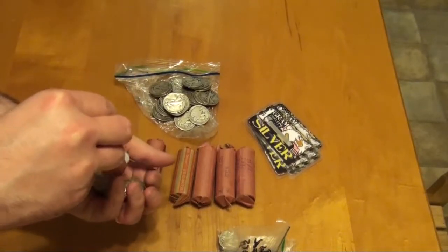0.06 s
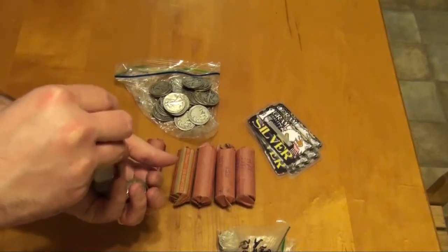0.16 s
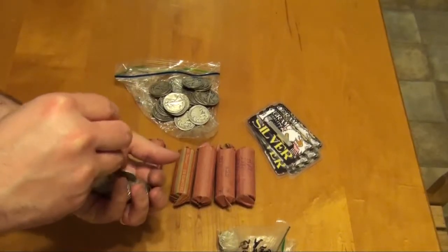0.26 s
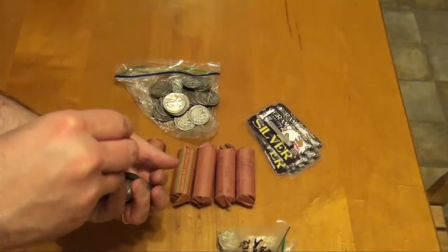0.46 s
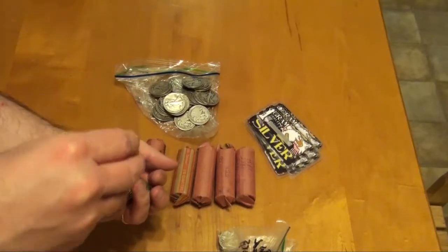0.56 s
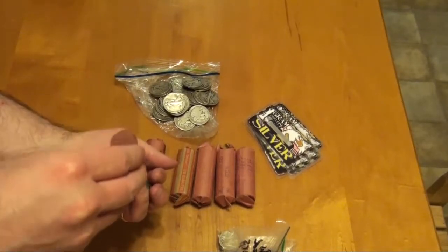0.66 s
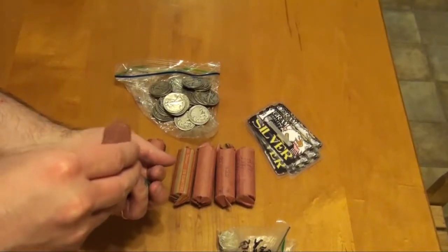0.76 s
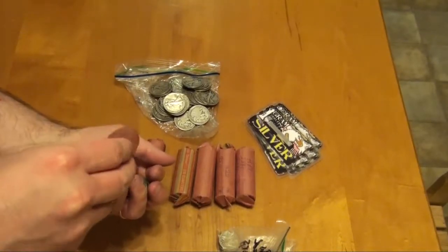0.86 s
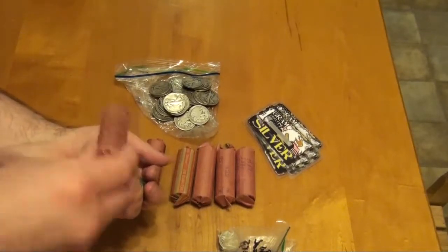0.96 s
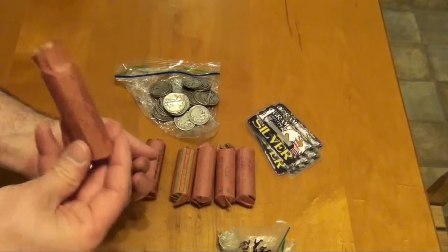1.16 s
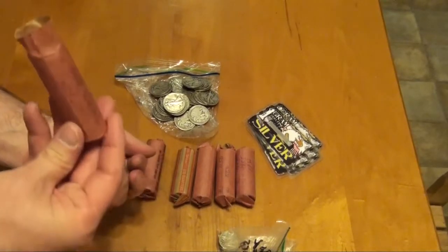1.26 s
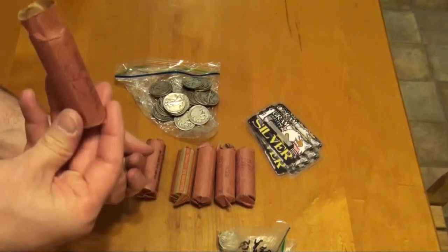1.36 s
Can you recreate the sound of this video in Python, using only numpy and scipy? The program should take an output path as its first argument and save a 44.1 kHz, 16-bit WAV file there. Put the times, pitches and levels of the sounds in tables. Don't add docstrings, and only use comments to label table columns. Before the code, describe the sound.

Coins clink brightly as they slide from a paper roll into a palm: a few light ticks, a dense jingling burst, one last clink, then faint paper rustle in a quiet room, close stereo microphone.

```python
import sys
import numpy as np
from scipy import signal
from scipy.fft import rfft, irfft
from scipy.io import wavfile
from scipy.ndimage import uniform_filter1d

SR = 44100
rng = np.random.default_rng(int(sys.argv[2]) if len(sys.argv) > 2 else 0)


def digitize_waveform(pressure):
    field = np.atleast_2d(pressure).T
    bounded = np.clip(field, -1, 1)
    quanta = np.round(bounded * 32767).astype(np.int16)
    wavfile.write(sys.argv[1], SR, quanta)


def ratio(d):
    e = np.asarray(d, float) / 20
    return 10 ** e


N = 61739

# (frequency [Hz], density [dB per Hz])
AIR_MID_SPECTRUM = [(20, -29), (60, -2.5), (110, -3.5), (300, -10), (930, -19), (2500, -24), (9000, -26.5),
                    (16000, -27.5)]
AIR_SIDE_SPECTRUM = [(20, -52), (60, -14), (170, -5), (600, -5.5), (1200, -10.5), (4500, -24),
                     (10700, -35.5), (15500, -49.5)]
# (centre [s], length [s], level [dB], body re hiss [dB])
RUB_EVENTS = [(.008, .012, -47, -8), (.023, .012, -44, -7), (.061, .012, -47, -20), (.081, .010, -46, -20),
              (.128, .04, -60, 3), (.126, .007, -43, -18), (.157, .007, -38, -18), (.165, .012, -38, -17),
              (.247, .010, -40, -20), (.03, .12, -55, -5), (.19, .05, -59, -10), (.56, .05, -59, -3),
              (.65, .06, -62, -9), (.74, .05, -61, -9), (.775, .03, -58, -7), (.85, .05, -61, -10),
              (.91, .07, -63, -10), (.955, .012, -58, -15), (.985, .035, -57, -15), (1.05, .08, -64, -10),
              (1.115, .045, -59, -12), (1.16, .06, -65, -10)]
# (frequency [Hz], density [dB per Hz])
RUB_SPECTRUM = [(1500, -32.5), (2900, -21), (4500, -7), (6300, -10.5), (8300, -2.5), (10500, -8.5),
                (13400, -22.5), (16000, -41.5)]
# (frequency [Hz], width [Hz], level [dB])
TUBE_MODES = [(790, 92, -2), (1260, 120, 3), (1764, 170, -7), (2090, 80, -3.5)]
# (time [s], level [dB])
KNOCK_EVENTS = [
    (0.016, -60),
    (0.533, -61.5),
    (1.199, -65),
]
# (time [s], pitch [Hz], level [dB], T60 [s])
TAP_EVENTS = [(0.0197, 4160, -42.5, 0.035), (0.0241, 1314, -46, 0.043), (.0435, 4830, -36.5, 0.019),
              (0.09, 4650, -47, 0.011), (0.111, 1150, -49.5, 0.035), (.1135, 2206, -45.5, 0.043),
              (.1155, 790, -43.5, 0.062), (0.1172, 1299, -46, .04), (.119, 1762, -45, 0.04),
              (.126, 1248, -46, 0.084), (.154, 1886, -52.5, 0.066), (.2405, 3903, -31.5, 0.022),
              (.2455, 4486, -35, .02)]
# (time [s], peak [dB], ping pitch [Hz], thud re ping [dB])
TICK_EVENTS = [(.0435, -19.5, 7980, -12.5), (0.056, -30, 9800, -18.5), (.0577, -23.5, 9300, -22),
               (0.0893, -27.5, 8000, -14), (0.1116, -23.5, 8000, -6), (0.1199, -28.5, 8030, -15),
               (0.225, -21.5, 9050, -5.5), (0.2404, -27, 9600, 0.5), (0.2413, -14, 8960, -10),
               (0.2442, -22, 8500, -24.5), (0.2463, -19, 8266, -10.5), (0.2571, -15, 9530, -22.5),
               (0.2594, -18, 9250, -22), (0.2617, -16, 9035, -31.5), (.2671, -22.5, 8320, -18),
               (0.2747, -20, 8260, -20.5), (0.281, -22, 9400, -30), (0.2913, -21.5, 8800, -30),
               (0.295, -30, 9050, -25.5), (0.3004, -25, 9250, -24), (0.3062, -28, 8850, -22),
               (0.3112, -27, 9100, -22), (.0785, -33, 8070, -20.5), (0.081, -36, 7980, -19),
               (0.1241, -30, 8300, -19.5), (0.1556, -31, 7830, -14), (0.3849, -17, 9270, -23),
               (0.4008, -27, 8950, -11.5), (0.411, -32, 8470, -21), (0.413, -22, 8300, -26.5),
               (0.4157, -25, 8160, -28), (.407, -40, 8050, -25), (.5350, -41.5, 8770, -11),
               (0.9491, -46, 9000, -10), (.9660, -32.5, 9460, -1.5), (0.9669, -22.5, 8000, -30),
               (0.9692, -41.5, 7870, -2)]
# (frequency [Hz], density [dB per Hz])
SNAP_SPECTRUM = [(3000, -30.5), (6500, -10), (9000, 1.5), (12500, -16.5), (16000, -24)]
THUD_SPECTRUM = [(1000, -23.5), (2100, -8.5), (4300, 2.5), (6500, -12.5)]
# (start [s], length [s], start level [dB], end level [dB])
BRIGHT_STRETCHES = [(.0455, .009, -38, -43), (.057, .010, -39, -44), (.0735, .005, -33, -35),
                    (.080, .008, -42, -50), (.178, .047, -60, -62), (.2262, .0153, -10.5, -14.5),
                    (.2415, .0075, -16, -21), (.249, .007, -19, -13.5), (.256, .0025, -24, -24),
                    (.2585, .016, -14.5, -14.5), (.2745, .0075, -18, -18.5), (.282, .018, -17, -18),
                    (.300, .032, -18.5, -32), (.332, .017, -36, -38), (.349, .013, -43, -44),
                    (.362, .022, -40, -42), (.400, .0105, -28, -29), (.4105, .003, -36, -36),
                    (.4135, .003, -31, -31), (.4165, .018, -40, -50), (.950, .011, -51, -51)]
TWIN_STRETCHES = [
    (.073, 0.016, -56, -54.5),
    (0.278, 0.0221, -38, -35.5),
    (0.303, 0.012, -34, -44.5),
    (.34, 0.029, -46, -57),
]
LOW_STRETCHES = [
    (0.2268, .017, -35.5, -38.5),
    (.245, 0.011, -35.5, -49),
    (.29, 0.015, -45, -37),
    (.304, .018, -35.5, -51),
    (.34, 0.033, -50, -60),
    (.400, 0.011, -38.5, -35.5),
    (.41, 0.05, -53.5, -67),
]
HIGH_STRETCHES = [
    (.228, .015, -60, -46),
    (.243, .014, -41, -35),
    (.257, .020, -40, -35),
    (.277, .018, -40, -29),
    (.295, .010, -29, -34),
    (.305, .025, -40, -58),
    (.332, .036, -60, -64),
    (.402, .008, -54, -42),
    (.410, .012, -42, -64),
]
# (centre [s], length [s], level [dB], dull part re edges [dB])
CHATTER_EVENTS = [
    (0.265, 0.017, -33.5, -15),
    (0.2934, 0.047, -35.5, -15),
    (0.334, 0.06, -44.5, -12),
    (0.245, .01, -44, 4.5),
    (0.36, 0.0091, -41.5, -9),
    (0.43, 0.049, -56.5, -5.5),
]
# (frequency [Hz], density [dB per Hz])
EDGE_SPECTRUM = [(3000, -31), (6500, -11.5), (9000, 1.5), (11000, -9), (12200, -34.5), (16000, -40.5)]
STACK_SPECTRUM = [(900, -24), (1800, -7.5), (2700, -4.5), (3300, -8.5), (4200, 1), (5300, -2.5),
                  (6500, -7.5)]
# (frequency [Hz], level [dB])
ROOM_SPECTRUM = [(500, 3), (4000, 2), (8500, -3), (12000, -1.5), (16000, -12.5)]
# (time [s], base frequency [Hz], level [dB])
MOTOR_SPEED = [
    (1.05, 1350, -99),
    (1.09, 1355, -77),
    (1.14, 1285, -79),
    (1.2, 1345, -76),
    (1.25, 1365, -76),
    (1.3, 1275, -75),
    (1.35, 1190, -75),
    (1.37, 1170, -99),
]
# (multiple of base [1], level [dB])
MOTOR_HARMONICS = [
    (8, 0),
    (9, 0),
    (10, -5),
]


def unit(x):
    return x / np.sqrt(np.mean(x ** 2))


def colour(x, points):
    p = np.array(points, float)
    hz = np.fft.rfftfreq(len(x), 1 / SR) + 1
    gain_db = np.interp(np.log(hz), np.log(p[:, 0]), p[:, 1])
    return irfft(rfft(x) * ratio(gain_db), len(x))


def walk(rate_hz):
    k = max(int(SR / rate_hz), 2)
    held = np.repeat(rng.standard_normal(N // k + 1), k)
    return unit(uniform_filter1d(uniform_filter1d(held, k), k)[:N])


def decay(t, t60_s):
    return np.exp(-np.log(1000) * t / t60_s)


def rise(t, rise_s):
    return 1 - np.exp(-(t / rise_s) ** 2)


def pan(left_over_right_db):
    return ratio(np.array([[left_over_right_db], [-left_over_right_db]]) / 2)


def air():
    mid = unit(colour(rng.standard_normal(N), AIR_MID_SPECTRUM)) * ratio(-58)
    side = unit(colour(rng.standard_normal(N), AIR_SIDE_SPECTRUM)) * ratio(-58.5)
    return np.array([mid + side, mid - side])


def slips():
    grains_per_s, grain_spread_db = 12000, 1
    noise = rng.standard_normal(N)
    hit = rng.random(N) < grains_per_s / SR
    return noise * (0.48 + hit * ratio(grain_spread_db * rng.exponential(size=N)))


def bursts(events, bright, dull):
    t = np.arange(N) / SR
    out = np.zeros(N)
    for centre_s, length_s, level_db, dull_db in events:
        swell = np.exp(-(2 * (t - centre_s) / length_s) ** 2)
        out += ratio(level_db) * swell * (bright + ratio(dull_db) * dull)
    return out


def rubs(grains):
    hz = np.fft.rfftfreq(N, 1 / SR)
    tube = .12 / (1 + (hz / 2500) ** 4) * (hz > 500)
    for mode_hz, width_hz, level_db in TUBE_MODES:
        tube = tube + ratio(level_db) / np.hypot(1, (hz - mode_hz) / width_hz)
    hiss = unit(colour(grains, RUB_SPECTRUM))
    body = unit(irfft(rfft(grains) * tube, N))
    return bursts(RUB_EVENTS, hiss, body)


def far_knocks():
    pitch_hz, t60_s = 935, 0.54
    t = np.arange(N) / SR
    env = np.zeros(N)
    for start_s, level_db in KNOCK_EVENTS:
        env += ratio(level_db) * (t > start_s) * decay(np.abs(t - start_s), t60_s)
    phase = 2 * np.pi * np.cumsum(pitch_hz + 15 * walk(72)) / SR
    return np.sqrt(2) * env * np.sin(phase)


def taps():
    t = np.arange(N) / SR
    out = np.zeros(N)
    for start_s, hz, level_db, t60_s in TAP_EVENTS:
        u = np.maximum(t - start_s, 0)
        tone = np.sqrt(2) * np.sin(2 * np.pi * hz * u)
        out += ratio(level_db) * tone * decay(u, t60_s) * rise(u, .0015)
    return out


def ticks():
    rise_s, ping_t60_s, thud_t60_s = .0007, 0.0058, 0.0072
    snap_db, thud_trim_db = -2, -6
    t = np.arange(1024) / SR
    out = np.zeros(N + len(t))
    noise = rng.standard_normal((len(TICK_EVENTS), 2, len(t)))
    for (start_s, peak_db, hz, thud_db), (snap_noise, thud_noise) in zip(TICK_EVENTS, noise):
        snap = ratio(snap_db) * unit(colour(snap_noise, SNAP_SPECTRUM))
        ping = (np.sin(2 * np.pi * hz * t) + snap) * decay(t, ping_t60_s)
        thud = unit(colour(thud_noise, THUD_SPECTRUM)) * decay(t, thud_t60_s)
        contact = (ping + ratio(thud_db + thud_trim_db) * thud) * rise(t, rise_s)
        i = int(start_s * SR)
        out[i:i + len(t)] += ratio(peak_db) * 2 * contact
    return out[:N]


def coin_ring(mode_hz, stretches):
    wobble_hz, waver_db, edge_per_s = 8, .6, 1500
    t = np.arange(N) / SR
    env = np.zeros(N)
    for start_s, length_s, start_db, end_db in stretches:
        u = (t - start_s) / length_s
        level = ratio(start_db + (end_db - start_db) * np.clip(u, 0, 1))
        opening = u * length_s * edge_per_s + .5
        closing = (1 - u) * length_s * edge_per_s + 1
        env = np.maximum(env, level * np.clip(np.minimum(opening, closing), 0, 1))
    env = uniform_filter1d(uniform_filter1d(env, size=24), size=24)
    phase = 2 * np.pi * np.cumsum(mode_hz + wobble_hz * walk(60)) / SR
    return np.sqrt(2) * env * ratio(waver_db * walk(250)) * np.sin(phase)


def room(source):
    t60_s, gap_s, level_db, side_db = 0.24, 0.0044, -10, -8.5
    t = np.arange(SR // 2) / SR
    tails = []
    for noise in rng.standard_normal((2, len(t))):
        echo = colour(noise, ROOM_SPECTRUM) * decay(t, t60_s) * (t > gap_s)
        echo = unit(echo) / np.sqrt(len(t))
        tails.append(signal.fftconvolve(source, echo)[:N])
    mid, side = tails
    return ratio(level_db) * (mid + ratio(side_db) * side * np.array([[1], [-1]]))


def chatter(grains):
    edges = unit(colour(grains, EDGE_SPECTRUM))
    stack = unit(colour(grains, STACK_SPECTRUM))
    return bursts(CHATTER_EVENTS, edges, stack)


def lens_motor():
    t = np.arange(N) / SR
    time_s, base_hz, level_db = np.array(MOTOR_SPEED).T
    turn = 2 * np.pi * np.cumsum(np.interp(t, time_s, base_hz)) / SR
    whine = np.zeros(N)
    for multiple, line_db in MOTOR_HARMONICS:
        whine += ratio(line_db + 2.1 * walk(40)) * np.sin(multiple * turn)
    return ratio(np.interp(t, time_s, level_db)) * whine


def scene():
    floor = air() + far_knocks() + lens_motor()
    grains = slips()
    friction = (rubs(grains) + chatter(grains)) * ratio(1.8 * walk(300))
    hands = friction + taps() + ticks()
    coins = ratio(2) * coin_ring(10765, BRIGHT_STRETCHES)
    coins = coins + coin_ring(6398, LOW_STRETCHES) + coin_ring(6176, TWIN_STRETCHES)
    high = ratio(2) * coin_ring(14850, HIGH_STRETCHES)
    tail = room(ratio(-7) * (coins + ratio(-5.5) * high) + hands)
    return coins * pan(2.5) + high * pan(0.5) + hands * pan(2) + tail + floor


def top_cut(x):
    return signal.sosfilt(signal.butter(12, 16990, fs=SR, output="sos"), x)


def record(dry):
    low_pass = signal.ellip(6, .2, 34, 15800, fs=SR, output="sos")
    mix = signal.sosfilt(low_pass, dry)
    return top_cut(mix)


dry = scene()
out = record(dry)
digitize_waveform(out)
```